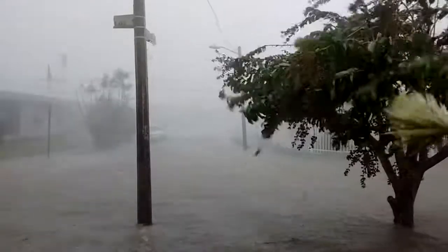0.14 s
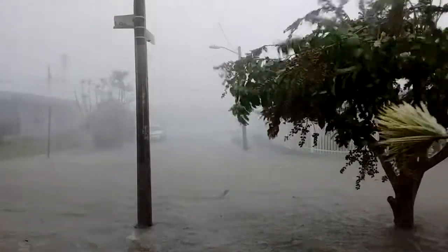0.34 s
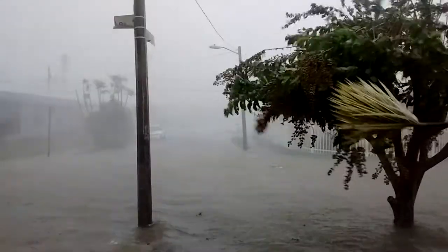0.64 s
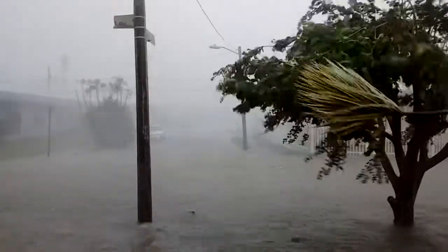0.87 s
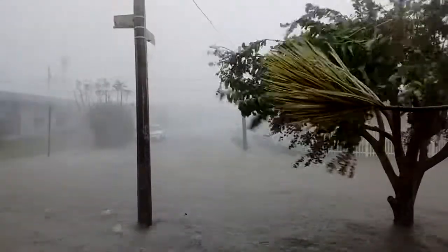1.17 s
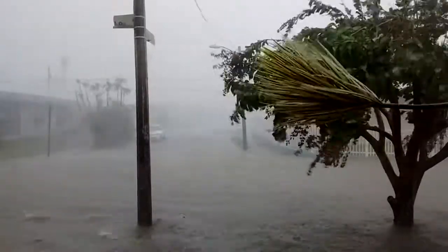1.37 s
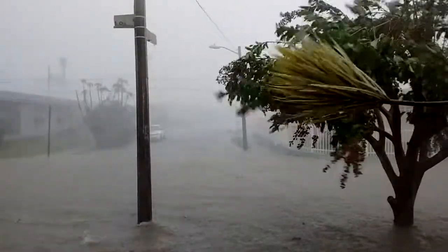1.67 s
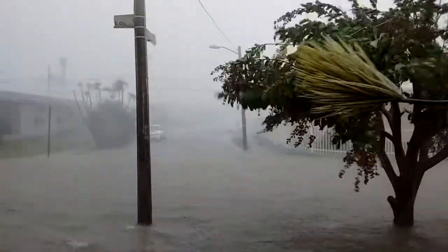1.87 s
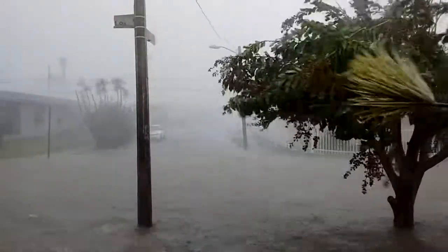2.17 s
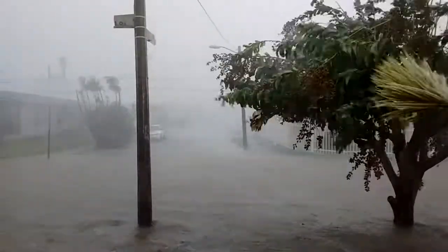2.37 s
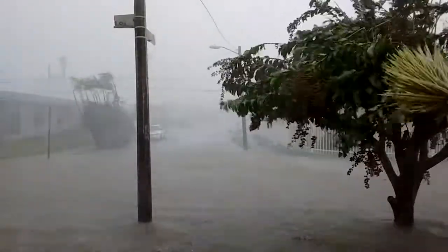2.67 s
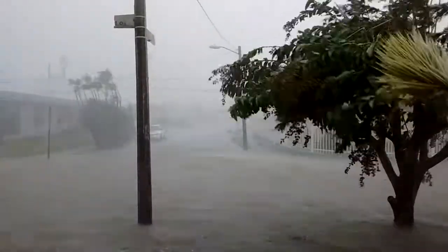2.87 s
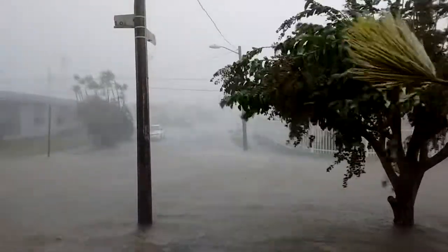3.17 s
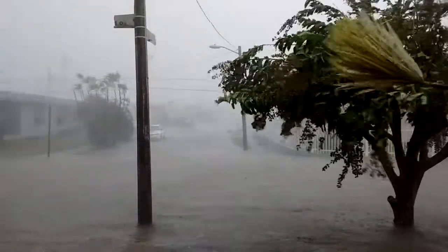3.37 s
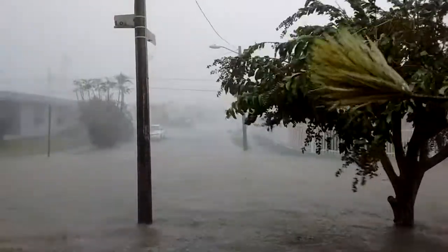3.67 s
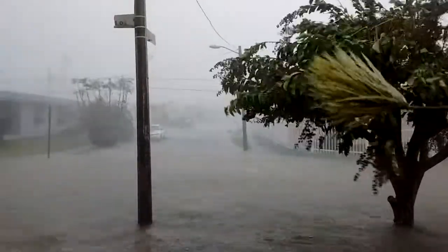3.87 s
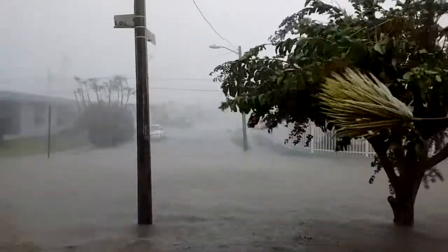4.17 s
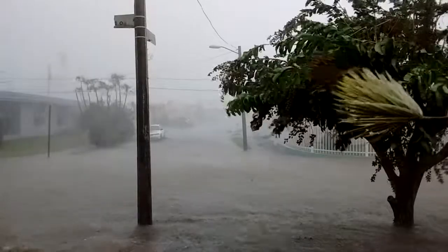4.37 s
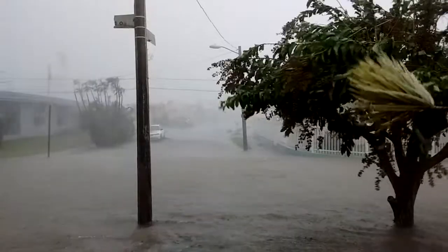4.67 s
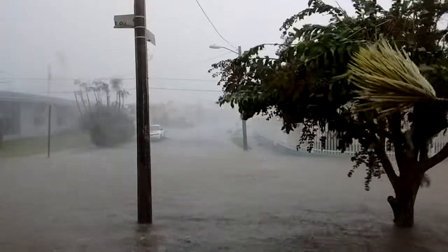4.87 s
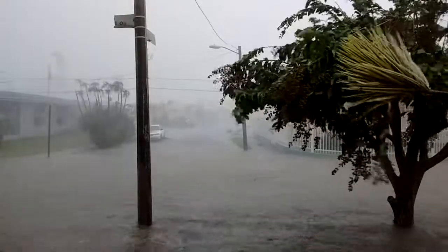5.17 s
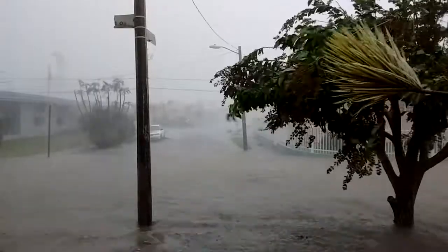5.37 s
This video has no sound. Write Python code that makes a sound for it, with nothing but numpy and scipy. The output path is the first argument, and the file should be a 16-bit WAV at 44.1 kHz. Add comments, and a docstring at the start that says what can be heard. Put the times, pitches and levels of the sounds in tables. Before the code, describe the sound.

Torrential rain and surging storm wind, close drops ticking, a tree lashing, a couple of dull thumps, and a brief windy whistle at the end.

```python
"""A hurricane over a flooded street, heard from a phone with two microphone ports.
From the start far rain roars in gusts (filtered noise), eddies buffet the ports and a wet tree thrashes,
while near rain spatters (random clicks over spray noise). Big drops (noise bursts) tick from 0.3 s on.
Dull knocks (damped tones) thump just after 1 s and near 1.35 s; the tree thrashes again near 2.2 and 5.2 s.
Near 5.4 s wind whistles (narrow noise). The phone subtracts each port, delayed, from the other."""
import sys
import numpy as np
from scipy import signal
from scipy.fft import rfft, irfft, next_fast_len
from scipy.io import wavfile
from scipy.ndimage import uniform_filter1d

SR = 44100
rng = np.random.default_rng(int(sys.argv[2]) if len(sys.argv) > 2 else 0)


def wav_out(sig):
    """Save sig, one row per channel (or a flat mono array), as 16-bit PCM at SR to the path in sys.argv[1]."""
    wavfile.write(sys.argv[1], SR, np.round(np.clip(np.atleast_2d(sig).T, -1, 1) * 32767).astype(np.int16))


N = 243873
TIME = np.arange(N) / SR  # s
SIZE = next_fast_len(N + 2048, True)  # filter length, with spare room after the sound
FREQS = np.maximum(np.arange(SIZE // 2 + 1) * SR / SIZE, 1)  # Hz

# strong pushes of wind: (peak [s], strength [dB], rise [s], low body of the roar [dB], rush pitch [Hz])
GUSTS = [(0.09, 4, 0.11, -0.5, 1600), (0.55, 2.5, 0.12, -1.5, 1400), (0.97, 5, 0.21, -1, 1610),
         (1.74, 1, 0.18, -2.5, 1300), (2.27, -0.3, 0.075, -5, 1950), (2.41, 2.5, 0.045, -7, 1800),
         (2.77, 1, 0.073, 0, 1500), (3.25, 2.5, 0.09, 1.5, 1400), (3.44, 1.4, 0.065, 1.5, 1900),
         (3.95, 2, 0.079, 0, 1300), (4.22, 2, 0.099, 0.5, 1300), (4.47, 1.5, 0.041, 0.5, 1250),
         (4.78, 2.5, 0.18, -2, 1300), (5.11, 1.5, 0.14, 5, 1190), (5.44, 3.5, 0.095, 4, 1350)]
# the uneven wind beneath the gusts: (time [s], level of its roar [dB])
WIND = [(0, -28.5), (1.25, -30), (1.7, -24.5), (2, -26.5), (2.2, -25), (3, -24.5), (3.65, -25.2),
        (4.5, -23.5), (4.95, -26), (5.26, -22.5), (5.53, -25.5)]


def undb(db):
    """Turn decibels into gain."""
    return 10 ** (np.asarray(db) / 20)


def unit(x):
    """Scale to an rms (average strength) of 1."""
    return x / np.sqrt(np.mean(x ** 2))


def curves(table):
    """Join each column of a table by straight lines in time."""
    s, *columns = np.transpose(table)
    return [np.interp(TIME, s, column) for column in columns]


def response(points):
    """Gain at every frequency from (frequency [Hz], level [dB]) points."""
    hz, db = np.transpose(points)
    return undb(np.interp(np.log(FREQS), np.log(hz), db))


def shape(x, gain):
    """Filter a sound by a gain at every frequency."""
    return irfft(rfft(x, SIZE) * gain, SIZE)[..., :N]


def walk(rate):
    """A randomly wandering level: random steps, `rate` of them a second, smoothed twice; spread near 1."""
    step = int(SR / rate)
    held = np.repeat(rng.standard_normal(N // step + 1), step)
    return 1.3 * uniform_filter1d(uniform_filter1d(held, step), step)[:N]


def swells(events):
    """Sum of smooth bumps, each (peak [s], height, rise [s], fall [s])."""
    t = TIME[::64]  # a coarse clock is enough for slow bumps
    total = 0
    for s, height, rise_s, fall_s in events:
        side_s = np.where(t < s, rise_s, fall_s)
        total = total + height * np.exp(-((t - s) / side_s) ** 2)
    return np.interp(TIME, t, total)


def gusts(fall_s=0.072):
    """What the gusts add to the level and to the low body of the roar, both in dB; all fall equally fast."""
    strength_db = swells([(s, db, rise_s, fall_s) for s, db, rise_s, _, _ in GUSTS])
    body_db = swells([(s, body, rise_s, fall_s) for s, _, rise_s, body, _ in GUSTS])
    return strength_db, body_db


def roar(flicker_db=1.06, flicker_rate=34, body_hz=750, hollow_hz=440):
    """Far rain and trees: fluttering noise bands gain body with the wind; gusts rush around their own pitch."""
    # colour of the roar: (frequency [Hz], level [dB])
    roar_spectrum = [(100, -38), (280, -5), (370, -4.5), (550, -4), (850, -3.5), (1250, -2.5), (1700, -3.5),
                     (2200, -8), (2800, -9.5), (4200, -15.5), (7000, -24.5)]
    # moments when the low roar hollows out: (time [s], depth [dB], half length [s])
    lulls = [(0.33, -3, .12), (0.74, -7, 0.073), (2.56, -20, 0.097), (3.7, -7, 0.092), (5.433, -15, 0.04)]
    body_per_wind = 0.26  # dB of low body per dB of wind
    gust_focus, focus_octaves = .6, .5  # how much a gust favours its pitch; width of that rush
    rush_octaves_per_db = -0.1  # the rush sinks towards its own pitch as a gust builds, climbs as it dies

    wind_db, = curves(WIND)
    gust_db, gust_body_db = gusts()
    peak_db, _, _, peak_hz = curves(GUSTS)
    rush_hz = peak_hz * 2 ** (rush_octaves_per_db * (gust_db - peak_db))
    body_db = body_per_wind * wind_db + gust_body_db
    body_db = body_db - body_db.mean()
    lull_db = swells([(s, db, half_s, half_s) for s, db, half_s in lulls])

    air = rfft(rng.standard_normal((2, N)), SIZE) * response(roar_spectrum)
    air = air / irfft(air, SIZE)[:, :N].std()
    out = 0
    for hz in 125 * 2 ** (np.arange(13) / 2):  # bands half an octave apart
        band = np.maximum(1 - 2 * np.abs(np.log2(FREQS / hz)), 0)
        low_share = 1 / (1 + (hz / body_hz) ** 4)
        focus = np.exp(-(np.log2(hz / rush_hz) / focus_octaves) ** 2)
        db = flicker_db * walk(flicker_rate) + low_share * body_db
        db = db + gust_focus * (focus - .5) * gust_db
        db = db + lull_db / (1 + (hz / hollow_hz) ** 6)  # lulls act on the low bands
        out = out + irfft(air * band, SIZE)[:, :N] * undb(db)
    return out * undb(wind_db + gust_db)


def buffet(eddy_db=1.0, eddy_rate=30, swell_db=-12):
    """Eddies push one port and pull the other, each size with its own flutter; a swell pushes both at once."""
    # colour of the push and pull: (frequency [Hz], level [dB])
    buffet_spectrum = [(12, -19), (30, -2), (45, -12), (70, -2.5), (110, 1.5), (180, -2), (300, -5),
                       (500, -9.5), (750, -12), (1100, -36), (1600, -41), (3000, -55), (12000, -85)]
    # colour of the swell on both ports: (frequency [Hz], level [dB])
    swell_spectrum = [(20, 2), (50, -1.5), (110, -1.5), (180, 2), (280, -15.5), (500, -21), (1500, -38),
                      (8000, -90)]
    # eddies, and slack air where negative: (time [s], strength [dB], half length [s], pitch [Hz])
    eddies = [(0.15, 3.5, 0.074, 200), (0.36, -4.5, .08, 330), (0.52, 3, 0.054, 180), (0.71, -5, .06, 200),
              (0.97, 3.5, .04, 220), (1.04, 6, .04, 65), (1.2, -2, .08, 300), (1.39, 5, .04, 90),
              (1.79, 3, 0.056, 220), (1.914, 6.5, 0.058, 95), (2.162, 3, 0.035, 65), (2.48, -2, .1, 100),
              (2.558, -4.5, 0.074, 380), (2.86, 3, .03, 170), (3.047, 2.5, .05, 105), (3.22, 6, 0.039, 190),
              (3.732, -1.5, .08, 330), (3.967, 5.5, 0.1, 140), (4.157, 6, .035, 65), (4.57, 4, 0.03, 210),
              (4.74, 3.5, 0.064, 260), (5.24, 1, 0.13, 220), (5.44, -4.5, .04, 230)]
    eddy_octaves = 1.5  # spread of an eddy around its pitch
    swell_flutter_db = 3
    buffet_db, buffet_per_gust = -22.5, 0.3  # base level; dB per dB of gust
    buffet_per_wind, small_eddy_hz = 0.9, 150  # faster wind favours small eddies, above this pitch

    wind_db, = curves(WIND)
    gust_db, _ = gusts()
    across = shape(rng.standard_normal(N), response(buffet_spectrum))
    swell = shape(rng.standard_normal(N), response(swell_spectrum))
    swell = swell * undb(swell_flutter_db * walk(eddy_rate))
    ports = unit(np.array([across, -across])) + undb(swell_db) * unit(swell)
    out = 0
    for hz in 16 * 2 ** np.arange(9):  # bands an octave apart
        band = np.maximum(1 - np.abs(np.log2(FREQS / hz)), 0)
        bumps = []
        for s, db, half_s, pitch in eddies:
            nearness = np.exp(-(np.log2(hz / pitch) / eddy_octaves) ** 2)
            bumps.append((s, db * nearness, half_s, half_s))
        speed_db = buffet_per_wind * (wind_db - wind_db.mean()) / (1 + (small_eddy_hz / hz) ** 2)
        out = out + shape(ports, band) * undb(swells(bumps) + speed_db + eddy_db * walk(eddy_rate))
    return out * undb(buffet_db + buffet_per_gust * gust_db)


def leaves(flap_db=2.2, flap_rate=45, rustle_db=-57, leaves_per_gust=0.66):
    """Wet leaves: flapping noise over a faint rustle, loud when the tree is bent over, then settling."""
    # colour of the leaves: (frequency [Hz], level [dB])
    leaf_spectrum = [(900, -19), (1800, -7.5), (2600, -2.5), (3600, -0.5), (4600, -9), (9000, -28)]
    # the tree thrashes: (peak [s], level [dB], rise [s], settling [s])
    thrashes = [(0.05, -35.5, .2, 0.38), (2.21, -28, 0.13, 1.2), (5.22, -33, 0.15, 0.7)]
    shaking = undb(rustle_db)  # the leaves never quite rest
    for s, db, rise_s, settle_s in thrashes:
        fade = np.where(TIME < s, ((s - TIME) / rise_s) ** 2, (TIME - s) / settle_s)
        shaking = shaking + undb(db) * np.exp(-fade)
    rush = shape(rng.standard_normal((2, N)), response(leaf_spectrum))
    flapping = unit(rush * undb(flap_db * walk(flap_rate)))
    gust_db, _ = gusts()
    return flapping * shaking * undb(leaves_per_gust * gust_db)


def sheets(rain_per_gust=0.51):
    """Level of the near rain in dB: every gust shifts it in proportion to its strength."""
    # how hard it rains nearby beneath the gusts: (time [s], level [dB])
    rainfall = [(0, -26), (0.28, -30), (0.7, -30.5), (0.95, -29.5), (1.14, -32), (1.36, -32), (1.5, -29.5),
                (2.04, -29.5), (2.2, -25), (2.45, -25), (3.27, -27), (3.36, -28), (4.5, -30), (5.53, -29.5)]
    rain_db, = curves(rainfall)
    gust_db, _ = gusts()
    return rain_db + rain_per_gust * gust_db


def spatter(per_second=12000, spread_db=2.5, mist_db=-1, flurry_db=1.0, flurry_rate=36, split_hz=6000):
    """Thousands of drop clicks a second over a smooth mist of spray; low and high parts flutter separately."""
    # colour of the near rain: (frequency [Hz], level [dB])
    spatter_spectrum = [(1000, -12.5), (2000, -3.5), (2700, -3), (3550, -2), (4300, -6.5), (5200, -8.5),
                        (6300, -12.5), (8000, -8.5), (9300, -8), (11000, -16.5), (12700, -23.5),
                        (15500, -24.5)]
    lands = rng.random((2, N)) < per_second / SR
    sizes = undb(spread_db * np.minimum(rng.exponential(size=(2, N)), 7))
    clicks = lands * sizes * np.sign(rng.standard_normal((2, N)))
    rain = unit(clicks) + undb(mist_db) * rng.standard_normal((2, N))
    coarse = 1 / (1 + (FREQS / split_hz) ** 6)  # coarse drops sound lower, fine ones higher
    out = 0
    for part in (coarse, 1 - coarse):
        drops = shape(rain, response(spatter_spectrum) * part)
        out = out + drops * undb(flurry_db * walk(flurry_rate))
    return unit(out) * undb(sheets())


def add(out, s, sound):
    """Lay a short sound into both ports at time s."""
    start = int(np.clip(s * SR, 0, N - 1))
    out[:, start:start + sound.shape[-1]] += sound[..., :N - start]


def splash(hz, decay_s, width=0.15, rise_s=0.00034):
    """One drop: a sharp burst of spray noise around its ring pitch, dying away quickly; peak 1."""
    t = TIME[:SR // 25]
    edges_hz = np.clip([hz / (1 + width), hz * (1 + width)], 100, .45 * SR)
    band = signal.butter(2, edges_hz, "band", fs=SR, output="sos")
    envelope = (1 - np.exp(-t / rise_s)) * np.exp(-t / decay_s)
    burst = signal.sosfilt(band, rng.standard_normal(len(t)) * envelope)
    return burst / np.abs(burst).max()


def patter():
    """Big drops close by that stand out of the spatter: short ticks and longer splats."""
    # big drops: (time [s], peak level [dB], ring pitch [Hz], decay [s])
    big_drops = [(.330, -24, 7500, .003), (.988, -28, 8200, .003), (1.770, -26, 4770, .004),
                 (1.904, -24, 7800, .003), (2.022, -28, 10500, .004), (2.212, -22, 5500, 0.0054),
                 (2.978, -20, 4100, .003), (3.255, -15.5, 3600, .009), (3.2905, -21, 4500, .007),
                 (3.2915, -18, 8400, .0022), (3.398, -23, 9000, .003), (3.639, -23, 5800, .003),
                 (4.168, -20, 3620, 0.014), (4.18, -27, 8200, .01), (4.243, -28, 9700, .003),
                 (4.730, -25, 8200, .003), (4.845, -21, 8700, .004), (5.195, -22, 8300, .002),
                 (5.409, -24, 9400, .004), (5.520, -25, 7600, .003)]
    out = np.zeros((2, N))
    for s, db, hz, decay_s in big_drops:
        add(out, s, undb(db) * splash(hz, decay_s))
    return out


def knocks(rasp_hz=800, rasp_s=.009, rise_s=.008):
    """Low thumps on the phone, alike on both ports: a soft push rings damped tones under a rasp of air."""
    # dull knocks: (time [s], level [dB], dull above [Hz], rasp of air [dB])
    thumps = [(1.040, -3.7, 750, -33), (1.066, -8.5, 270, -27), (1.353, -9, 240, -33)]
    # tones they ring with: (frequency [Hz], level [dB], decay [s])
    modes = [(98, -2, .018), (155, 11, .004), (230, -9.5, .014), (303, -8.4, .011), (424, -5, .0075)]
    out, t = np.zeros((2, N)), TIME[:SR // 5]
    edges_hz = [rasp_hz / np.sqrt(2), rasp_hz * np.sqrt(2)]
    band = signal.butter(2, edges_hz, "band", fs=SR, output="sos")
    for s, db, dull_hz, rasp_db in thumps:
        ring = 0
        for k, (hz, mode_db, decay_s) in enumerate(modes):
            strength = (-1) ** k * undb(mode_db) / (1 + (hz / dull_hz) ** 4)  # signs alternate
            ring = ring + strength * np.sin(2 * np.pi * hz * t) * np.exp(-t / decay_s)
        push = 1 - np.exp(-t / rise_s)
        rasp = unit(signal.sosfilt(band, rng.standard_normal(len(t))))
        rasp = rasp * t / rasp_s * np.exp(1 - t / rasp_s)
        add(out, s, undb(db) * (ring * push + undb(rasp_db) * rasp))
    return out


def whistle(peak_s=5.43, level_db=-27, pitch_hz=2560, half_s=0.04, width_hz=170):
    """The last gust sings briefly in the wires: a breathy, narrow band of noise that swells and fades."""
    air = shape(rng.standard_normal((2, N)), np.exp(-((FREQS - pitch_hz) / width_hz) ** 2))
    return unit(air) * swells([(peak_s, undb(level_db), half_s, half_s)])


def scene():
    """Pressure at the two ports: rain, tree and whistle tinted per port, plus buffeting and knocks."""
    # how the two ports differ in tone: (frequency [Hz], left minus right [dB])
    port_balance = [(150, -2), (1200, -1.5), (3000, 2), (4300, -1), (6000, 7.5), (8000, 0), (9500, -1.5),
                    (14000, 0.5)]
    lean = np.sqrt(response(port_balance))  # half the difference goes to each port
    rain = roar() + whistle() + leaves() + spatter() + patter()
    rain = shape(rain, np.array([lean, 1 / lean]))
    return rain + buffet() + knocks()


def record(dry, bass_share=0.83, treble_share=.41, corner_hz=2100, left_db=.5, top_hz=15500):
    """Each channel is its own port minus the other one delayed, most strongly in the bass; the top is cut."""
    # delay between the ports: (frequency [Hz], delay [s])
    port_lag = [(9500, 0.000319), (12000, 0.000303)]
    share = treble_share + (bass_share - treble_share) / (1 + (FREQS / corner_hz) ** 2)
    share = np.clip(share, 0, 1)
    keep = 1 / np.sqrt(1 + share ** 2)  # makes up for the added power of the other port
    lag_s = np.interp(FREQS, *np.transpose(port_lag))
    delay = np.exp(-2j * np.pi * FREQS * lag_s)
    wide = shape(dry, keep) - shape(dry[::-1], keep * share * delay)
    wide = wide * undb([[left_db], [-left_db]])  # left slightly up, right slightly down
    return signal.sosfilt(signal.ellip(10, .2, 80, top_hz, fs=SR, output="sos"), wide)


dry = scene()
out = record(dry)
wav_out(out)
```